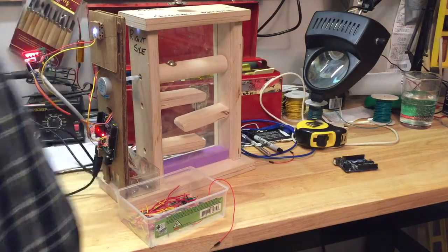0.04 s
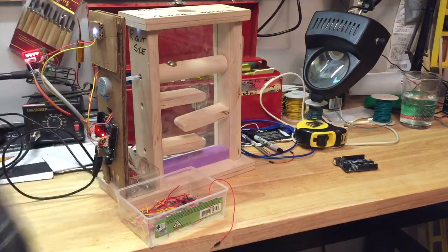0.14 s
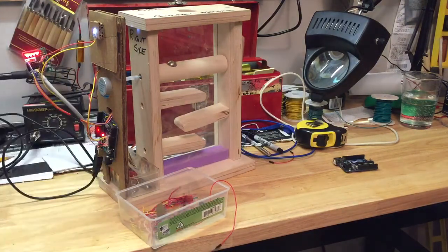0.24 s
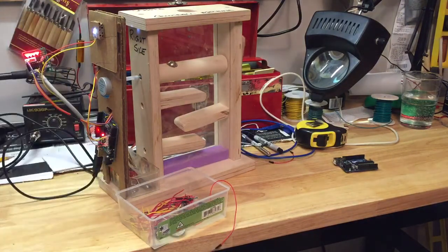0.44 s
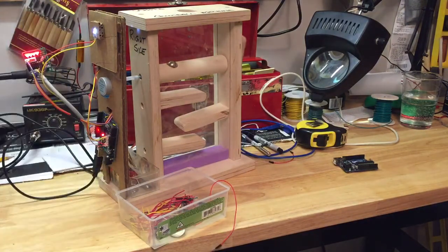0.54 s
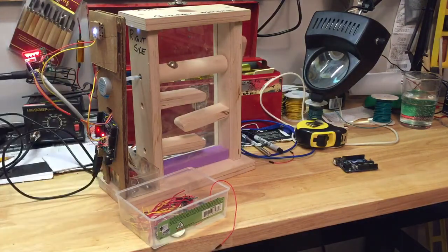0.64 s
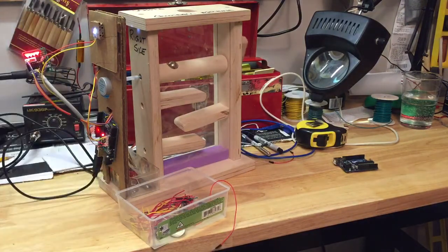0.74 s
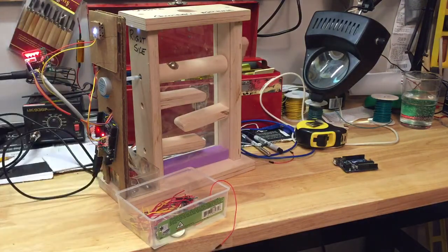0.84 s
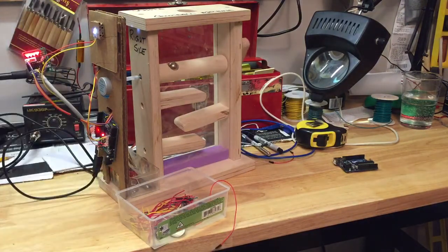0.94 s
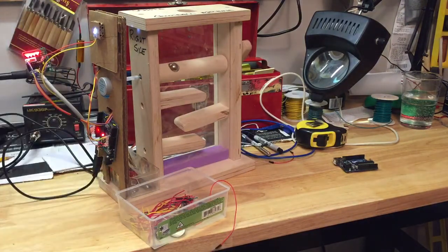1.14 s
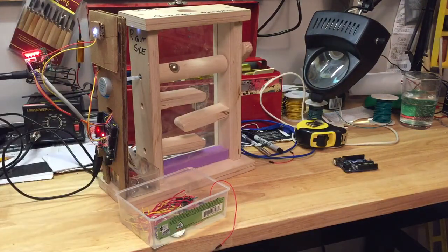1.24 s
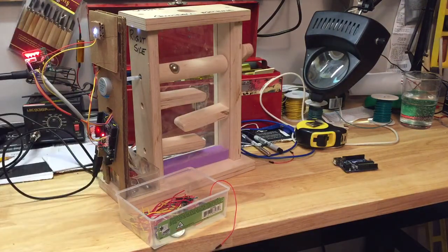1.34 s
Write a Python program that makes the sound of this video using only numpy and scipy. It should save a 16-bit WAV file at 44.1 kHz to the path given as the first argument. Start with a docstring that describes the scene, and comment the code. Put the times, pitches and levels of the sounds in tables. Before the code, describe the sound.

A small hard object cracks down onto a wooden bench and clatters among loose parts, settling within half a second; then three faint scuffing steps over a low motor hum, close microphone in a small indoor workshop.

```python
"""In a workshop a small hard object drops onto a wooden bench among loose parts, clatters and settles.
Each blow is a crack, a bright tick and a short ring that sets the bench modes ringing; soft notes tap
along. Loose parts rattle as dense grains, pitched clinks and a thin high ring. Someone steps with three
soft scuffs of gliding friction noise. A motor hums low as a wavering sine over steady noise."""
import sys
import numpy as np
from scipy import signal
from scipy.fft import rfft, irfft
from scipy.io import wavfile

SR = 44100
rng = np.random.default_rng(int(sys.argv[2]) if len(sys.argv) > 2 else 0)


def unload_wav(signal):
    """Save mono or channel-first audio to the path in sys.argv[1] as 16-bit WAV at rate SR, clipped to [-1, 1]."""
    wavfile.write(
        sys.argv[1],
        SR,
        np.round(np.clip(np.atleast_2d(signal).T, -1, 1) * 32767).astype(np.int16),
    )


def attenuation_scalar(level_db):
    """Turn a level in dB into a linear amplitude multiplier (20 dB per decade)."""
    decades = np.asarray(level_db, float) / 20
    return 10 ** decades


N = 61739  # length in samples, 1.4 s


def rms_one(x):
    """Scale to rms 1."""
    return x / np.sqrt(np.mean(x ** 2) + 1e-20)


def in_time(rows):
    """Table columns as lines in time, -120 dB outside the table."""
    s, *columns = np.transpose(rows)
    t = np.arange(N) / SR
    return [np.interp(t, s, column, left=-120, right=-120) for column in columns]


def ring(clicks, hz, t60):
    """Damped two-pole resonator: a unit click sets a sine of height 1 ringing."""
    r, w = attenuation_scalar(-60 / (t60 * SR)), 2 * np.pi * hz / SR
    return signal.lfilter([0, np.sin(w)], [1, -2 * r * np.cos(w), r * r], clicks + 1e-18)


def cut(x, hz, kind):
    """Butterworth filter."""
    return signal.sosfilt(signal.butter(2, hz, kind, fs=SR, output="sos"), x)


def colour(x, spectrum):
    """Give a dense sound a spectrum, drawn over log frequency; rms 1."""
    hz, db = np.transpose(spectrum)
    f = np.maximum(np.arange(N // 2 + 1) * SR / N, 1)
    gain = attenuation_scalar(np.interp(np.log(f), np.log(hz), db))
    return rms_one(irfft(rfft(x) * gain, N))


def blows():
    """Each impact gives a noisy crack, a bright tick, a short ring of its own and the bench modes."""
    # blows of the object:
    # (time [s], level [dB], pitch of its short ring [Hz], tick level relative to the blow [dB])
    blow_rows = [(0.2422, -30, 5000, -12), (0.2447, -13, 2500, -9), (0.2468, -9.5, 1800, -12),
                 (0.2507, -7, 3160, -11), (0.2522, -8, 2270, -13), (0.2567, -12.5, 1790, -23),
                 (0.259, -5.5, 3100, -15), (0.2619, -16.5, 3460, -20.5), (0.2635, -12, 900, -14),
                 (0.267, -30, 1150, -11), (.269, -15, 900, -33), (0.2725, -30, 2640, -24),
                 (.3005, -22.5, 750, -30.5), (0.306, -30, 3000, -35), (.3345, -23, 4500, -14),
                 (.3444, -26, 4500, -12), (.3483, -25, 4500, -9), (.3602, -20, 2400, -6),
                 (.378, -30, 2720, -22), (0.3853, -24, 5560, -8), (0.3905, -25, 5000, -6),
                 (.394, -25, 3100, -28), (0.4052, -23, 2700, -18), (.4093, -23, 2600, -12),
                 (0.424, -33.5, 2220, -9), (.445, -34, 3160, -7), (.487, -39, 1200, -7),
                 (0.4932, -38, 2800, -14), (0.531, -48, 2820, -2), (0.5428, -36, 1700, -16),
                 (0.5712, -35, 1900, -24), (0.5716, -46, 6000, -20), (0.5765, -42, 2940, -30),
                 (0.653, -38, 1300, -40), (0.6545, -45, 2600, -40)]
    # modes of bench and parts: (frequency [Hz], relative level [dB], t60 [s])
    body_modes = [(752, -24, .06), (900, -14, .06), (1078, -14, .05), (1318, -13, .04), (1590, -16, .05),
                  (1800, -10, .05), (2276, -9, .045), (2620, -13, .03), (3010, -14, .04), (3156, -9, .05),
                  (3280, -15, .04), (3724, -16, .04), (3965, -16, .04), (4300, -19, .04), (6150, -3, .006)]
    tick_gain_db, tick_decay_s, tick_low_hz = 1.5, 0.0011, 6000
    ring_db, ring_cycles = -1.5, 8  # the ring falls 60 dB in this many cycles
    crack_db, crack_decay_s = -3.5, 0.002
    crack_low, crack_high = 0.45, 1.88  # band edges as shares of the blow's pitch
    body_db, body_spread_db = -14, 4
    dull_db_per_octave = 6.5  # modes above the blow's pitch are struck less
    low_cut_hz = 500

    s, db, hz, tick_db = np.transpose(blow_rows)
    at = (s * SR).astype(int)
    spread = rng.standard_normal((len(s), len(body_modes)))

    def train(level_db):
        """One click at each blow."""
        clicks = np.zeros(N)
        clicks[at] = attenuation_scalar(level_db)
        return clicks

    tick_clicks = train(db + tick_db + tick_gain_db) + 1e-18
    tick_envelope = signal.lfilter([1], [1, -np.exp(-1 / (tick_decay_s * SR))], tick_clicks)
    out = cut(rng.standard_normal(N) * tick_envelope, tick_low_hz, "high")

    t = np.arange(SR // 20) / SR
    noises = rng.standard_normal((len(s), len(t)))
    for i, level_db, f, noise in zip(at, db, hz, noises):
        own_ring = attenuation_scalar(level_db + ring_db - 60 * t * f / ring_cycles) * np.sin(2 * np.pi * f * t)
        burst = attenuation_scalar(level_db + crack_db) * np.exp(-t / crack_decay_s) * noise
        crack = cut(burst, [crack_low * f, crack_high * f], "band")
        out[i:i + len(t)] += own_ring + crack

    for k, (f, mode_db, t60) in enumerate(body_modes):
        dull_db = dull_db_per_octave * np.maximum(np.log2(f / hz), 0)
        struck_db = db + body_db + mode_db - dull_db + body_spread_db * spread[:, k]
        out += (-1) ** k * ring(train(struck_db), f, t60)
    return cut(cut(out, low_cut_hz, "high"), low_cut_hz, "high")


def taps():
    """Soft taps: single damped sines with a rounded start."""
    # (time [s], level before rounding and decay [dB], pitch [Hz], rise time constant [s], t60 [s])
    tap_rows = [(0.019, -48.5, 1320, 0.00056, 0.026), (0.017, -56, 2400, .002, 0.052),
                (0.024, -52.5, 513, 0.003, 0.064), (0.253, -44, 72, .02, 0.26),
                (.258, -41, 150, .005, 0.22), (.41, -58.5, 68, 0.0098, 0.62), (.256, -36, 290, .006, .13),
                (.258, -24, 730, 0.003, 0.049), (.26, -39, 477, .003, 0.12), (.254, -29, 905, 0.0023, 0.06),
                (.406, -34, 724, 0.0037, 0.036), (.48, -51, 140.3, 0.011, 0.56),
                (.5432, -29, 726, 0.003, 0.03), (.543, -37, 1210, 0.0007, 0.025),
                (.547, -38, 915, .003, 0.07), (.62, -47, 138.6, 0.017, 0.17),
                (.572, -38, 700, 0.001, 0.025), (.572, -45, 1350, .001, .06), (.584, -35, 700, 0.004, 0.03),
                (.59, -42, 930, .002, .04), (0.653, -44, 1000, 0.0005, 0.025),
                (1.026, -35.5, 704, 0.00041, 0.0091), (1.038, -47, 520, 0.0012, 0.025),
                (1.322, -48.5, 1850, 0.0042, 0.034), (1.324, -47, 420, 0.0021, 0.03),
                (1.387, -43.5, 2140, 0.0028, 0.024)]
    out, t = np.zeros(N), np.arange(SR // 3) / SR
    for s, db, hz, rise, t60 in tap_rows:
        i = int(s * SR)
        envelope = attenuation_scalar(db - 60 * t / t60) * (1 - np.exp(-t / rise))
        note = envelope * np.sin(2 * np.pi * hz * t)
        out[i:i + len(t)] += note[:N - i]
    return out


def rattle():
    """Dense tiny contacts of loose parts, pitched clinks among them, and a thin high ring."""
    # loose parts: (time [s], level [dB], treble level [dB])
    rattle_levels = [(.245, -28.5, -24), (.262, -27, -37.5), (.285, -33.5, -41.5), (.325, -44, -48.5),
                     (.34, -38, -45), (.37, -40, -44.5), (.395, -44.5, -43.5), (.415, -36.5, -46),
                     (.44, -47, -50), (.48, -53, -65), (.492, -42.5, -54.5), (.535, -53.5, -61.5),
                     (.56, -50, -75), (.6, -60, -70.5), (.66, -59.5, -72), (.74, -69.5, -79),
                     (.84, -81, -86.5)]
    # spectra of the body and the treble of the rattle: (frequency [Hz], relative density [dB per Hz])
    body_colour = [(150, -42.5), (300, -4.5), (480, -2.5), (750, 2.5), (1100, 5), (1800, 6), (2900, 5),
                   (4500, -4), (6500, -17.5), (9000, -35)]
    treble_colour = [(3530, -33), (6000, -4), (7770, -13.5), (9010, -7), (10400, -14.5), (16000, -14.5)]
    # thin high ring: (time [s], level [dB])
    thin_levels = [(.32, -70), (.335, -46), (.4, -64), (.42, -59)]
    grains_per_s, grain_spread_db = 22000, 0.5
    clinks_per_s, clink_low_hz, clink_high_hz = 900, 2600, 6500
    clink_cycles, clink_db = 24, 1  # a clink falls 60 dB in this many cycles
    thin_hz, thin_half_width_hz = 15610, 25

    db, treble_db = in_time(rattle_levels)
    contacts = rng.random(N) < grains_per_s / SR
    strength = attenuation_scalar(grain_spread_db * np.minimum(rng.exponential(1, N), 4))
    grains = contacts * strength * rng.standard_normal(N)

    hits = (rng.random(N) < clinks_per_s / SR) * rng.standard_normal(N)
    dealt = rng.integers(0, 20, N)  # which of 20 pitches each hit sounds
    clinks = np.zeros(N)
    for k, hz in enumerate(np.geomspace(clink_low_hz, clink_high_hz, num=20)):
        clinks += ring(hits * (dealt == k), hz, clink_cycles / hz)

    thin_band = [thin_hz - thin_half_width_hz, thin_hz + thin_half_width_hz]
    thin = rms_one(cut(rng.standard_normal(N), thin_band, "band"))

    out = attenuation_scalar(db) * colour(grains, body_colour)
    out += attenuation_scalar((db + treble_db) / 2 + clink_db) * rms_one(clinks)
    # the grains shifted by half a second serve as separate treble grains
    out += attenuation_scalar(treble_db) * colour(np.roll(grains, SR // 2), treble_colour)
    return out + attenuation_scalar(in_time(thin_levels)[0]) * thin


def scuffs():
    """Friction: noise through resonators that glide in pitch, with a swell of hiss at each scuff."""
    # friction bands: (time [s], level [dB], centre at start [Hz], centre at end [Hz], rise [s], fall [s],
    # width of each of two resonators in series [share of centre])
    friction_bands = [(0.777, -61, 883, 1136, 0.016, 0.066, 0.83),
                      (0.785, -68.5, 4270, 3900, 0.0084, 0.043, 0.38),
                      (0.791, -68, 2260, 1948, 0.013, 0.051, 0.44),
                      (1.002, -66, 1800, 1480, 0.015, 0.11, 0.78),
                      (1.033, -54.5, 880, 1050, 0.019, 0.022, 0.26),
                      (1.055, -65.5, 1000, 1150, .01, 0.067, 0.31),
                      (1.028, -63, 3260, 4250, 0.029, 0.039, 0.18),
                      (1.055, -67, 5360, 5400, 0.024, .018, 0.32),
                      (1.053, -59.5, 2640, 2850, 0.011, 0.028, 0.26),
                      (1.299, -67, 2460, 4500, 0.034, 0.055, 0.77),
                      (1.313, -65, 833, 1200, 0.015, 0.042, 1.05),
                      (1.331, -67.5, 6100, 7000, 0.012, 0.055, 0.37)]
    # hiss of each scuff: (time [s], level [dB], rise [s], fall [s])
    hiss_rows = [(0.783, -59, 0.02, 0.065), (1.027, -59.5, 0.026, 0.055), (1.32, -66.5, 0.03, 0.06)]
    hiss_low_hz = 7590
    block = 128  # samples between steps of the glide
    out, t = np.zeros(N), np.arange(N) / SR

    def swell(start, rise, fall):
        """Rounded rise and fall between 0 and 1."""
        line = np.minimum((t - start) / rise, 1 - (t - start - rise) / fall)
        return np.sin(0.5 * np.pi * np.clip(line, 0, 1)) ** 2

    hiss = rms_one(cut(rng.standard_normal(N), hiss_low_hz, "high"))
    for start, db, rise, fall in hiss_rows:
        out += attenuation_scalar(db) * swell(start, rise, fall) * hiss

    for start, db, from_hz, to_hz, rise, fall, width in friction_bands:
        noise, band, state = rng.standard_normal(N), np.zeros(N), np.zeros((2, 2))
        length = rise + fall
        for i in range(int(start * SR), min(N, int((start + length) * SR)), block):
            f = from_hz * (to_hz / from_hz) ** ((i / SR - start) / length)
            r = np.exp(-np.pi * width * f / SR)
            g = (1 - r * r) / 2
            resonator = [g, 0, -g, 1, -2 * r * np.cos(2 * np.pi * f / SR), r * r]
            source = noise[i:i + block] / np.sqrt(g / 2)  # keeps the level even across widths
            band[i:i + block], state = signal.sosfilt([resonator] * 2, source, zi=state)
        out += attenuation_scalar(db) * swell(start, rise, fall) * band
    return out


def hum():
    """A low motor tone: a sine of fixed pitch whose level wavers."""
    # (time [s], rms level [dB])
    hum_levels = [(0.0, -54), (0.05, -59), (0.124, -56), (0.202, -72.5), (0.264, -46.5), (0.294, -69),
                  (0.4, -57.5), (0.494, -57), (0.536, -60.5), (0.668, -57.5), (0.762, -54), (0.886, -57.5),
                  (0.934, -65), (1.0, -56), (1.034, -59.5), (1.148, -55), (1.272, -57.5), (1.334, -52),
                  (1.366, -54), (1.4, -54)]
    hum_hz = 194.3
    tone = np.sqrt(2) * np.sin(2 * np.pi * hum_hz * np.arange(N) / SR)
    return attenuation_scalar(in_time(hum_levels)[0]) * tone


def room(x):
    """Reverberation: ten parallel feedback delays, duller on every round."""
    t60_s, wall_cut_hz = 0.26, 8200  # t60 of the lows; one-pole loss of treble
    out, dull = np.zeros(N), np.exp(-2 * np.pi * wall_cut_hz / SR)
    lags = (np.geomspace(0.009, 0.041, 10) * SR).astype(int)  # delays from 9 to 41 ms
    for k, lag in enumerate(lags):
        loop, state = x.copy(), [0.]
        gain = attenuation_scalar(-60 * lag / SR / t60_s)
        for i in range(lag, N, lag):
            back, state = signal.lfilter([gain * (1 - dull)], [1, -dull], loop[i - lag:i], zi=state)
            loop[i:i + lag] += back[:N - i]
        out += (loop - x) * (-1) ** k  # only the echoes, in alternating sign
    return out


def room_air():
    """Steady background: white noise given the spectrum of the room."""
    # (frequency [Hz], relative density [dB per Hz])
    air_colour = [(15, -50), (25, -37), (70, -20), (100, -27.5), (145, -14.5), (195, -14), (280, -21),
                  (354, -22), (430, -34), (575, -32), (1300, -32.5), (3250, -39), (7000, -45), (16000, -50)]
    level_db = -62.5
    return attenuation_scalar(level_db) * colour(rng.standard_normal(N), air_colour)


def scene():
    """Object, loose parts and steps with their reverberation, over motor and room air."""
    reverb_db = -19.5
    near = blows() + taps() + rattle() + scuffs()
    mix = near + attenuation_scalar(reverb_db) * room(near) + hum() + room_air()
    return mix[None]  # one channel


def low_pass(x):
    """Removes everything above the highest recorded frequency."""
    return signal.sosfilt(signal.butter(12, 16820, fs=SR, output="sos"), x)


def record(dry):
    """The microphone loses the deep bass, then a steep low-pass cuts the top."""
    mic_low_hz, top_hz = 40.4, 15750
    dry = cut(cut(dry, mic_low_hz, "high"), mic_low_hz, "high")
    steep = signal.ellip(12, 0.5, 70, top_hz, fs=SR, output="sos")  # 0.5 dB ripple, 70 dB stop
    finished = signal.sosfilt(steep, dry)
    return low_pass(finished)


dry = scene()
out = record(dry)
unload_wav(out)
```